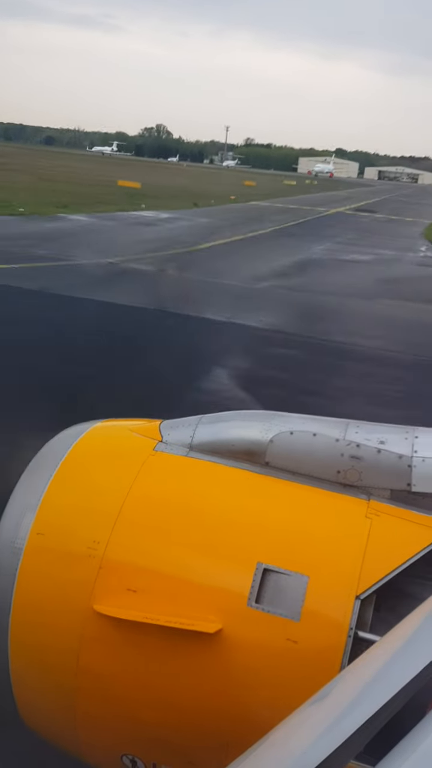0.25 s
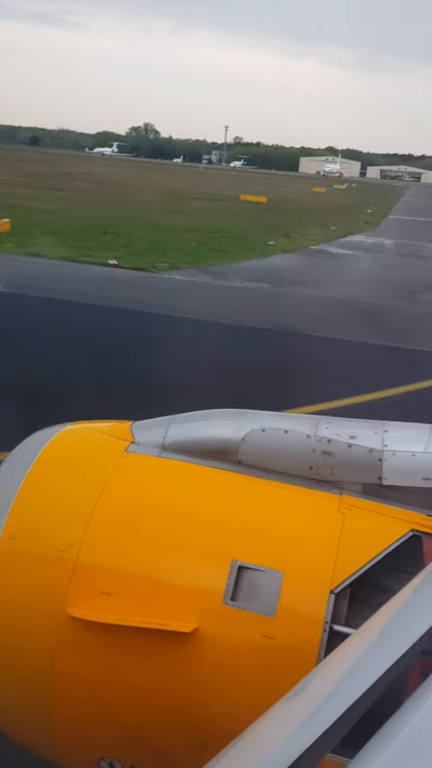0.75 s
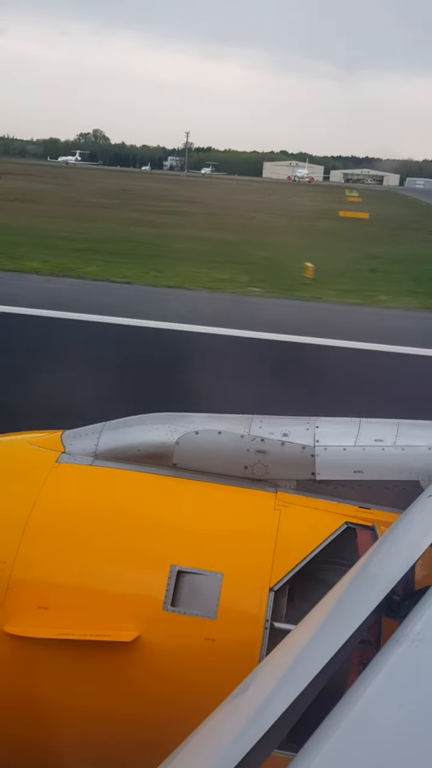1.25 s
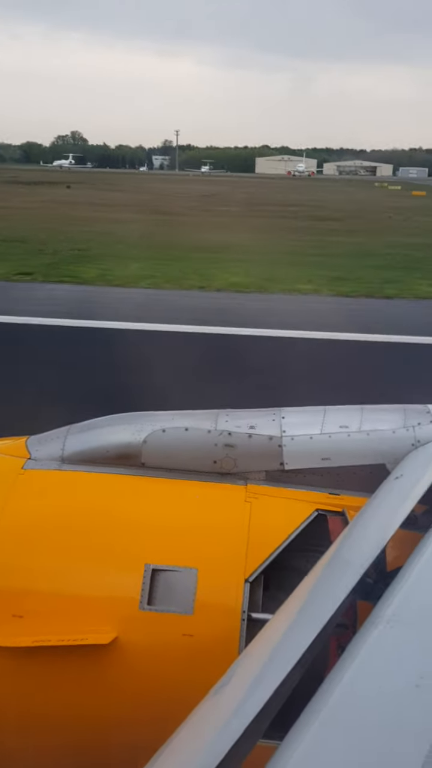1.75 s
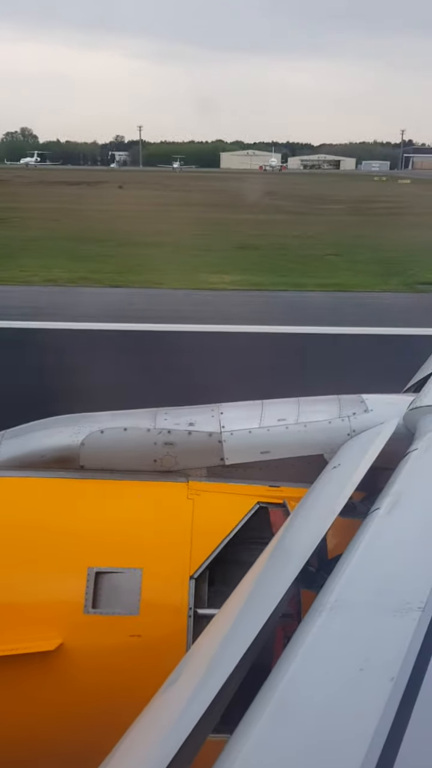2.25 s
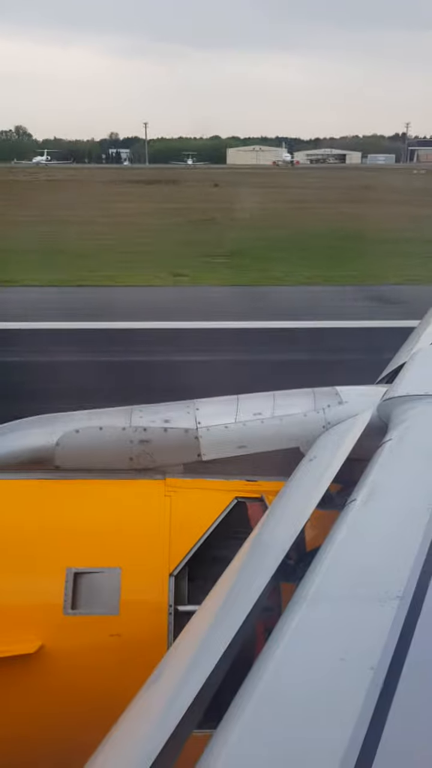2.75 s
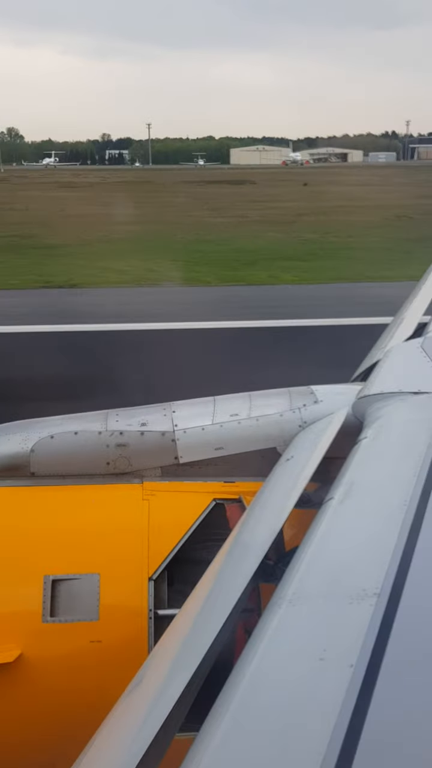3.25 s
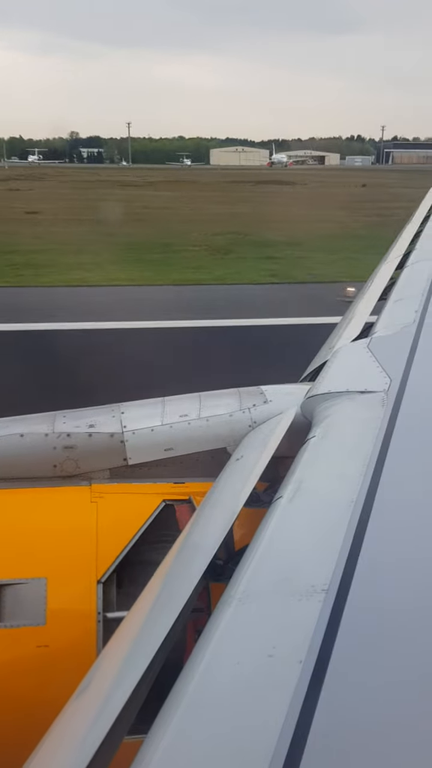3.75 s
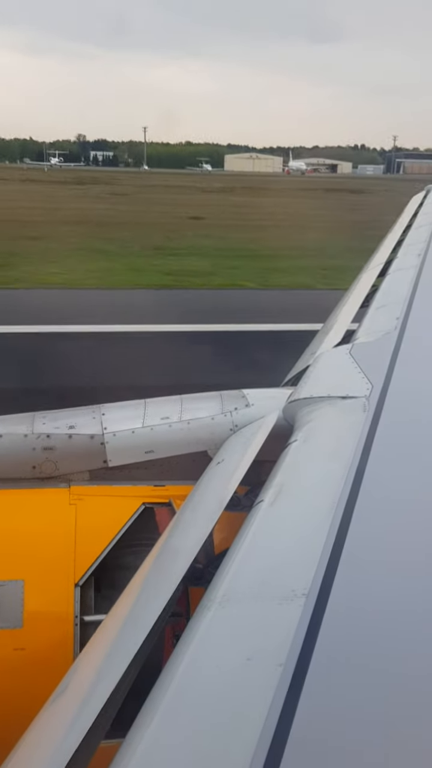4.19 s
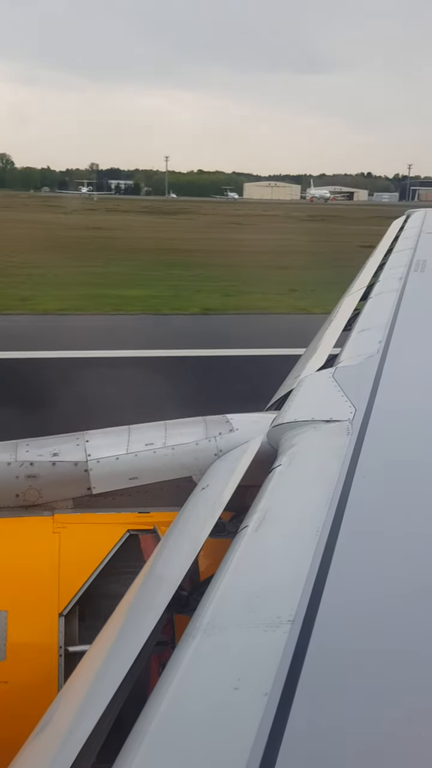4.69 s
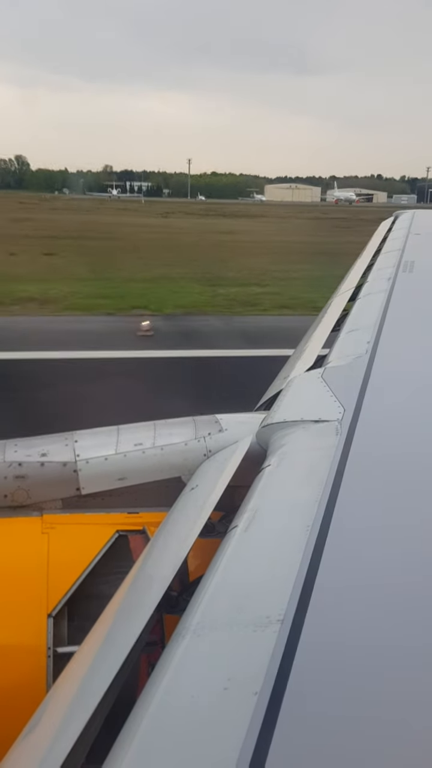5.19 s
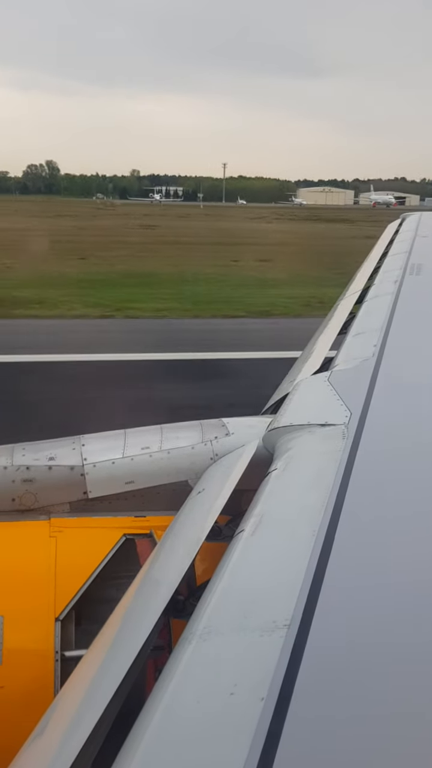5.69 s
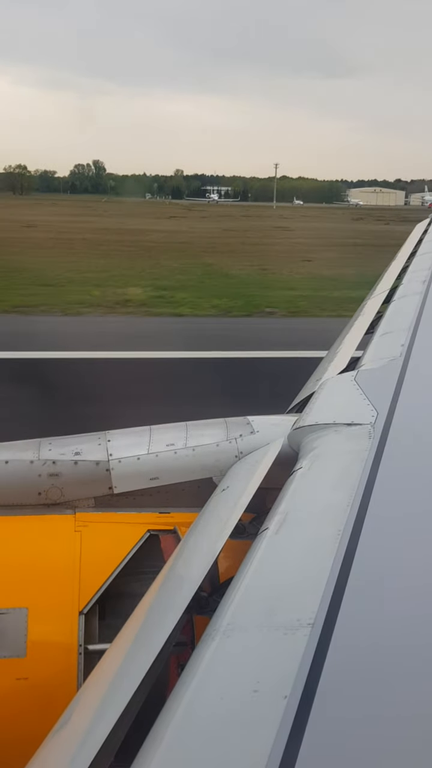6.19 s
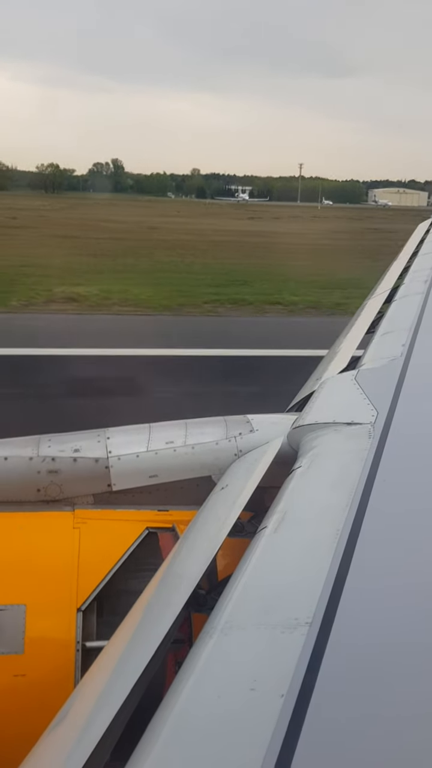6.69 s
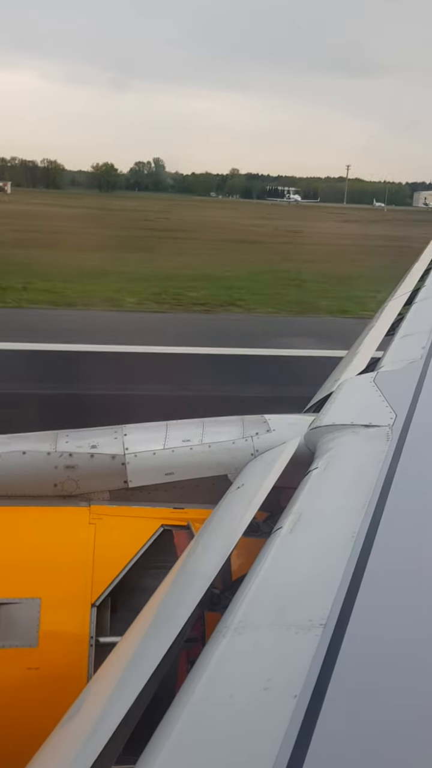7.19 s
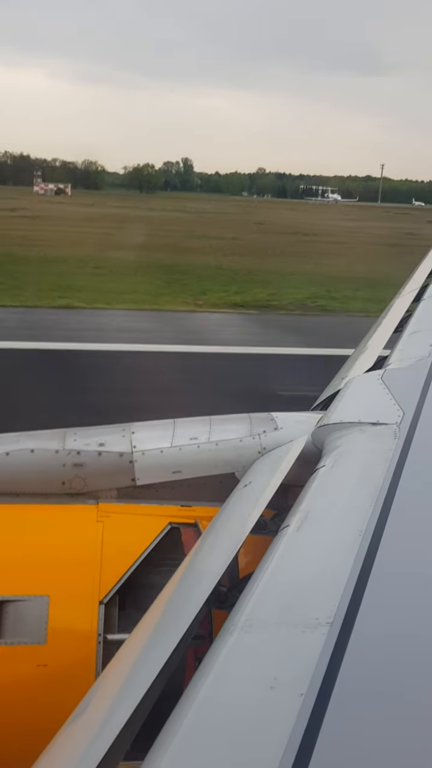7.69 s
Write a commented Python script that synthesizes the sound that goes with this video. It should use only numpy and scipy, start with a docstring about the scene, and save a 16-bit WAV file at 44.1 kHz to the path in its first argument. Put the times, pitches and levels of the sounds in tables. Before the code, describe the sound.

A loud, muffled roar of jet engines in reverse thrust is heard from inside an airliner cabin during the landing roll. A deep, steady drone and a higher hum sit over low runway rumble and a light hiss of air. Between about 0.4 and 0.7 seconds, four sharp, dry taps land close on the left, the last the loudest, among faint squeaks from the trim. The roar eases from about 1 to 2 seconds, then swells back. Another few taps come on the left between 3 and 3.5 seconds. From 3 seconds on, shaking panels give short, high, faint squeaks and loose fittings buzz in brief fits, busiest until about 5 seconds. The drone and roar hold steady, with a soft low bump from the runway near 7 seconds, and continue to the end at about 8 seconds.

```python
"""Inside an airliner's cabin, at a window beside the engine, during the landing roll in reverse thrust.
Two shaft tones, carried by the structure, drone over the runway rumble and the turbulent roar of the
reversed air, dulled by the fuselage. The shaking makes the cabin trim squeak by friction, buzz by
repeated impact and rustle, and a few dry taps land close to the left microphone."""
import sys
import numpy as np
from scipy import signal
from scipy.fft import rfft, irfft, next_fast_len
from scipy.io import wavfile
from scipy.ndimage import uniform_filter1d, minimum_filter1d, map_coordinates

SR = 44100
rng = np.random.default_rng(int(sys.argv[2]) if len(sys.argv) > 2 else 0)


def dump_mix(stems):
    """Bounce the given channels to the path in sys.argv[1] as a 16-bit WAV at rate SR."""
    frames = np.atleast_2d(stems).T  # one column per channel
    limited = np.clip(frames, -1, 1)  # hard clip at full scale
    pcm = np.round(limited * 32767).astype(np.int16)
    wavfile.write(sys.argv[1], SR, pcm)


N = 350154

# The roar's strength, with one early lull. Each row: time in seconds, dB against the steady roll.
FLOW = [(0, 3), (.55, 1.5), (1.2, -6.5), (1.75, -7.5), (2.15, -0.5), (3.6, 1), (4.4, 0.02), (7, 0.74),
        (7.94, 0)]
DRONE_HZ, WHINE_HZ = 168.45, 388.1  # the two shaft tones in the steady roll
HISS_DB, HISS_SLOPE = -43, 0.87  # level in the steady roll, dB per dB of the roar's strength


def amp(db):
    """Decibels as an amplitude ratio."""
    return 10 ** (np.asarray(db) / 20)


def unit(x):
    """Normalisation to an rms of 1."""
    return x / np.sqrt(np.mean(x ** 2) + 1e-20)


def along(points, hz):
    """Interpolation of (Hz, value) points on a logarithmic frequency axis."""
    knots_hz, values = np.transpose(points)
    return np.interp(np.log(hz + 1), np.log(knots_hz + 1), values)


def curve(points):
    """Linear interpolation of (seconds, value) points at every sample."""
    return np.interp(np.arange(N) / SR, *np.transpose(points))


def wobble(rate):
    """Smooth random modulation: a spline through `rate` Gaussian knots a second."""
    knots = rng.standard_normal(int(N * rate / SR) + 4)
    return map_coordinates(knots, [np.arange(N) * rate / SR])


def filtered(x, response):
    """Linear filtering: the spectrum of x times a frequency response."""
    size = next_fast_len(N + SR // 2)
    return irfft(rfft(x, size) * response(np.fft.rfftfreq(size, 1 / SR)), size)[..., :N]


def pan(lean_db):
    """Intensity stereo: two gains for a level difference, left minus right."""
    return amp(np.array([[.5], [-.5]]) * lean_db)


def add(track, start, sound):
    """Superposition of a sound on a track, `start` seconds in."""
    room = track[..., round(start * SR):][..., :sound.shape[-1]]
    room += sound[..., :room.shape[-1]]


def bursts(rows, rise_s, fall_s):
    """An envelope of exponential rise, hold and exponential decay for each (start, length, dB) row."""
    envelope, t = np.zeros(N), np.arange(SR) / SR
    for start, length, db in rows:
        decay = np.exp(-np.maximum(t - length, 0) / fall_s)
        add(envelope, start, amp(db) * (1 - np.exp(-t / rise_s)) * decay)
    return envelope


def flow_level(steady_db, slope):
    """A power law: a layer's level in dB moves by `slope` for each dB of the roar's strength."""
    return steady_db + slope * curve(FLOW)


def shaken(share, slots=120):
    """A random point process, denser as the cabin shakes more: rows of a time and two normal draws."""
    # The trim's restlessness. Each row: time in seconds, events a second at a share of 1.
    shaking = [(0, 4), (1, .5), (2.9, .5), (3.6, 7), (5.1, 7), (5.5, 1), (7.9, 1)]
    slot_s = N / SR / slots
    chance, spread = rng.random((slots, 2)), rng.standard_normal((slots, 2))
    starts = (np.arange(slots) + chance[:, 0]) * slot_s
    happens = chance[:, 1] < share * slot_s * np.interp(starts, *np.transpose(shaking))
    return np.column_stack([starts, spread])[happens]


def cabin(x, t60, wet_db):
    """Reverberation: seats and panels scatter a sound into a short tail, different at each microphone."""
    t = np.arange(SR // 4) / SR
    tail = rng.standard_normal((2, len(t))) * amp(-60 * t / t60)
    tail /= np.linalg.norm(tail, axis=1, keepdims=True)
    scattered = signal.fftconvolve(np.atleast_2d(x), tail, axes=1)[:, :N]
    return (x + amp(wet_db) * scattered) / np.hypot(1, amp(wet_db))


def rush(spectrum, patchy_db):
    """Turbulent noise of rms 1, partly coherent: the two microphones agree most at long wavelengths."""
    # Likeness of the two sides. Each row: frequency in Hz, correlation from -1 to 1.
    correlation = [(60, 1), (200, 0.89), (300, 0.69), (480, 0.64), (700, -0.17), (1400, -0.35),
                   (3000, 0.071), (12000, -0.42)]
    # Stereo balance. Each row: frequency in Hz, left minus right in dB.
    balance = [(60, 1), (115, 0.5), (160, 9), (230, 1.5), (330, 1), (650, 5), (950, 6), (1400, -0.5),
               (2250, -1.5), (3300, 1.5), (4800, 6), (7000, 4), (8500, 0), (15000, 1.5)]

    def mid_and_side(hz):
        """Correlation sets how the power divides between the sum and difference signals."""
        angle = np.arccos(np.clip(along(correlation, hz), -1, 1)) / 2
        return amp(along(spectrum, hz)) * [np.cos(angle), np.sin(angle)]

    cells = signal.stft(rng.standard_normal((2, N)), nperseg=512)[2]
    patches = uniform_filter1d(rng.standard_normal(cells.shape[1:]), size=6, axis=0)  # across frequency
    patches = uniform_filter1d(patches, size=14, axis=1)  # across time
    noise = signal.istft(cells * amp(patchy_db * unit(patches)), nperseg=512)[1][:, :N]
    mid, side = filtered(noise, mid_and_side)
    return unit(filtered(np.array([mid + side, mid - side]), lambda hz: pan(along(balance, hz))))


def runway_rumble():
    """Rolling noise: the runway shakes the wheels, and rough stretches swell the rumble."""
    # The rumble's spectrum. Each row: frequency in Hz, relative density in dB.
    spectrum = [(10, -22), (22, -10.5), (32, -10.5), (45, -1.5), (58, 4), (70, -5), (85, -7), (130, -25.5),
                (300, -70.5)]
    # Rough runway. Each row: start in seconds, length in seconds, level in dB.
    rough_stretches = [(0, 0.37, -19), (2.8, .3, -23.5), (3.5, .32, -21), (6.95, .25, -22.5)]
    swells = bursts(rough_stretches, rise_s=0.026, fall_s=0.046)
    return np.hypot(amp(flow_level(-24, slope=0.96)), swells) * rush(spectrum, patchy_db=-0.9)


def reversed_air():
    """Turbulence along the fuselage booms, roars and hisses; the wall passes low frequencies best."""
    # Spectra of the three bands in the cabin. Each row: frequency in Hz, relative density in dB.
    boom_spectrum = [(50, -30), (75, -3), (95, 0), (120, 0), (148, -3), (182, -2), (240, -13), (330, -20.5),
                     (500, -40), (900, -80)]
    roar_spectrum = [(120, -21), (250, 5.5), (340, 4), (420, 0.5), (500, -2), (620, -8.5), (780, -9),
                     (1000, -14), (1400, -21.5), (2500, -38), (6000, -84)]
    hiss_spectrum = [(500, -21.5), (1000, 4), (1500, 3.5), (2250, 3), (2700, -0.5), (3250, -2.5),
                     (4200, -8), (5000, -12.5), (6300, -16.5), (7200, -18.5), (8300, -25.5), (11000, -25),
                     (15500, -30.5)]
    gust = wobble(9.9)
    boom = amp(flow_level(-19, slope=1)) * rush(boom_spectrum, patchy_db=0)
    roar = amp(flow_level(-30, slope=1) + 0.19 * gust) * rush(roar_spectrum, patchy_db=1.55)
    hiss_db = flow_level(HISS_DB, HISS_SLOPE) + .5 * gust + 1.1 * wobble(40)
    return boom + roar + amp(hiss_db) * rush(hiss_spectrum, patchy_db=1.7)


def turbine_whistles():
    """Narrow-band noise is heard as pitch: turbine stages sing faintly, following the airflow."""
    # The whistles. Each row: centre in Hz, half-width in Hz, level in dB against the air's hiss.
    bands = [(3290, 130, -20), (7100, 40, -33), (7360, 70, -34)]
    track = np.zeros((2, N))
    for centre, width, db in bands:
        band = filtered(rng.standard_normal((2, N)), lambda hz: np.exp(-((hz - centre) / width) ** 2))
        track += amp(db) * unit(band)
    return amp(flow_level(HISS_DB, HISS_SLOPE)) * track


def airframe_bumps(cycles_to_peak=3.9):
    """Damped oscillation: each bump on the runway is a dull knock that swells and dies away."""
    # The knocks. Each row: start in seconds, pitch in Hz, peak level in dB.
    knocks = [(.257, 612, -32.5), (.293, 526, -27), (2.015, 884, -34), (3.365, 640, -36), (3.659, 850, -42),
              (7.029, 48, -17.5)]
    track, t = np.zeros(N), np.arange(SR // 3) / SR
    for start, hz, db in knocks:
        age = t * hz / cycles_to_peak
        add(track, start, amp(db) * age * np.exp(1 - age) * np.sin(2 * np.pi * hz * t))
    return track * pan(2)


def trim_rustles(grain_db=3, hiss_flicker_db=1.3):
    """Modulated noise: grainy, bright strokes over a faint, steady, slightly flickering microphone hiss."""
    # The strokes. Each row: start in seconds, length in seconds, level in dB.
    strokes = [(.524, .016, -41.5), (2.12, .067, -59), (2.97, .23, -57.5), (3.76, .013, -49.5),
               (5.679, .014, -38.5), (6.27, .06, -61), (7.0, .3, -60.5)]
    # The spectrum of strokes and hiss. Each row: frequency in Hz, relative density in dB.
    spectrum = [(800, -22), (2500, 5), (5000, 1.5), (8000, -5), (11500, -2.5), (15500, -6)]
    grain = amp(grain_db * wobble(400)) * rng.standard_normal((2, N))
    bright_noise = unit(filtered(grain, lambda hz: amp(along(spectrum, hz))))
    mic_hiss = amp(-65) * unit(amp(hiss_flicker_db * wobble(45)))
    return (bursts(strokes, rise_s=.0007, fall_s=0.0098) + mic_hiss) * bright_noise * pan(.5)


def fitting_rattles(jitter_cycles=.17, rebound_db=-6, scrape_s=.0008, faint_s=.02, faint_db=-52):
    """Forced impacts: in each drone cycle a loose fitting strikes, rebounds more lightly and rings."""
    # Fits of buzzing. Each row: start in seconds, length in seconds, level in dB.
    fits = [(.2, .05, -46), (.31, .028, -47.5), (.64, .037, -44.5), (3.04, 0.14, -49), (3.68, .11, -46.5),
            (3.85, .075, -46), (4.03, .02, -43.5), (4.18, 0.021, -44), (4.265, 0.045, -43),
            (4.385, .105, -47), (4.612, .06, -45.5), (4.742, .035, -43), (4.85, .048, -46.5),
            (5.885, .11, -48.5), (6.645, .042, -47), (7.18, .135, -47), (7.565, .07, -46),
            (7.772, .02, -47)]
    # The fitting's resonances. Each row: frequency in Hz, relative gain in dB.
    resonances = [(400, -25), (1100, 0), (1700, -3), (2900, 2), (3600, 2), (4150, 1), (4600, -2),
                  (5350, -8), (5680, 1), (6050, -10), (7200, -14), (7900, -21), (11500, -20), (15500, -23)]
    half_cycle = np.arange(1, int(2 * DRONE_HZ * N / SR) - 2)
    late, force_db = rng.standard_normal((2, len(half_cycle))) * [[jitter_cycles], [2.8]]
    at = np.round((half_cycle / 2 + late) * SR / DRONE_HZ).astype(int)
    force = amp(force_db + rebound_db * (half_cycle % 2))
    contacts = np.bincount(np.clip(at, 0, N - 1), force, minlength=N)
    # every contact breaks into about a millisecond of fine scraping
    scrape = signal.lfilter([1], [1, -np.exp(-1 / (scrape_s * SR))], contacts)
    scrape = scrape * rng.standard_normal((2, N))
    chatter = unit(filtered(scrape, lambda hz: amp(along(resonances, hz))))
    faint_fits = [(start, faint_s * np.exp(.4 * longer), faint_db + 2.5 * louder)
                  for start, longer, louder in shaken(share=1)]
    envelope = np.maximum(*[bursts(rows, rise_s=0.0016, fall_s=0.007) for rows in (fits, faint_fits)])
    return envelope * chatter * pan(11)


def panel_squeaks(swell_s=0.0053, faint_hz=3110, faint_db=-43, panel_hz=4220, panel_db=-13.5):
    """Stick-slip friction: a scratch settles into a raspy chirp with its octave and the panel's note."""
    # Trim panels slipping on each other. Each row: start in seconds, pitch in Hz, level in dB.
    slips = [(.208, 3570, -36), (0.408, 3636, -35), (.572, 3520, -33.5), (.979, 3655, -31),
             (2.994, 3084, -37), (3.102, 2460, -31), (3.535, 3634, -34), (3.721, 2980, -34),
             (3.99, 3195, -39.5), (4.468, 2930, -39), (4.657, 3166, -35.5), (5.035, 3320, -35.5),
             (5.74, 3145, -38), (6.521, 3154, -38), (6.843, 3040, -38), (7.3, 2757, -31),
             (7.566, 3110, -38.5)]
    # The octave's strength. Each row: the squeak's pitch in Hz, level in dB against the fundamental.
    octave_levels = [(2750, -18.5), (3100, -10.5), (3700, -19.5)]
    track, t = np.zeros((2, N)), np.arange(SR // 12) / SR
    envelope = t / swell_s * np.exp(1 - t / swell_s)
    glide = 0.01 * np.tanh(t / swell_s - 2)
    rasp_depth = .04 + .08 * np.exp(-t / .011)
    faint_slips = [(start, faint_hz * np.exp(0.046 * higher), faint_db + 1.5 * louder)
                   for start, higher, louder in shaken(share=.6)]
    grit = unit(uniform_filter1d(rng.standard_normal((2, N + SR)), size=24))
    for start, hz, db in slips + faint_slips:
        rasp = rasp_depth * grit[:, round(start * SR):][:, :len(t)]
        phase = 2 * np.pi * np.cumsum(hz * (1 + glide + rasp), axis=1) / SR
        octave = amp(along(octave_levels, hz)) * np.sin(phase + 2 * np.pi * hz * t)
        panel = amp(panel_db) * np.sin(phase + 2 * np.pi * (panel_hz - hz) * t)
        add(track, start, amp(db) * envelope * (np.sin(phase) + octave + panel))
    return cabin(track, t60=0.2, wet_db=-1) * pan(1.5)


def taps(casing_hz=850, casing_t60=.005):
    """Impulse response: each tap is one sharp push of pressure and a heavily damped swing of the casing."""
    # Each row: start in seconds, left peak in dB, bandwidth in Hz, bright tick in dB against the blow,
    # casing swing as a fraction of the blow, left minus right in dB.
    strikes = [(.4470, -14, 1800, -30, .14, 14), (.5075, -6.5, 2800, -50, .14, 18),
               (.5695, -9.5, 3000, -45, .14, 14), (.6823, 1, 3500, -48, .14, 30),
               (1.726, -30, 12000, -30, .05, -3), (3.081, -9.5, 4600, -32, .16, 14),
               (3.172, -18, 5500, -30, .1, 10), (3.2786, -8.5, 5700, -25, .12, 20),
               (3.4573, -7, 3900, -25, .24, 18)]
    track, t = np.zeros((2, N)), np.arange(SR // 50) / SR
    casing = np.cos(2 * np.pi * casing_hz * t) * amp(-60 * t / casing_t60)
    for start, db, width_hz, tick_db, swing, lean_db in strikes:
        blow = (t == 0) + swing * casing
        lowpass = signal.butter(6, width_hz, fs=SR, output="sos")
        push = signal.sosfilt(lowpass, blow) + amp(tick_db) * blow
        add(track, start, amp([[db], [db - lean_db]]) * push / push.max())
    return track


def shaft_tone(hz, flutter_db, rate, sway_rad):
    """Amplitude and phase modulation: a sine of rms 1 trembles with the airframe."""
    phase = 2 * np.pi * np.cumsum(hz) / SR + sway_rad * wobble(rate)
    return unit(amp(flutter_db * wobble(rate)) * np.sin(phase))


def engine_tones(sag_hz_per_db=0.26, dip_db=-10, dip_s=0.03):
    """Structure-borne sound: two almost pure shaft tones with faint harmonics sink as the roar eases."""
    # The deep drone, the upper whine and its octave. Each row: time in seconds, level in dB.
    drone_levels = [(0.0, -17), (0.06, -8.5), (0.15, -18), (0.17, -12), (0.66, -9), (0.68, -19),
                    (0.73, -12), (1.28, -17.5), (3.52, -10.5), (4.69, -10), (5.57, -15.5), (5.68, -12),
                    (6.12, -14), (6.17, -7), (6.21, -11), (7.76, -9.5), (7.94, -14)]
    whine_levels = [(0, -25.5), (.66, -25.5), (1.15, -34), (2.3, -30), (4.4, -21.5), (5.3, -24),
                    (6.15, -21), (7.94, -25.5)]
    octave_levels = [(0, -51), (.7, -50.5), (1.3, -62), (2.9, -46.5), (3.6, -46.5), (4.1, -53.5),
                     (7.9, -56)]
    # Brief dips in the whine's level. Each entry: time in seconds.
    dip_times = [2.36, 2.85, 3.56, 7.36]
    whine_hz = WHINE_HZ + sag_hz_per_db * curve(FLOW)
    drone_hz = whine_hz * DRONE_HZ / WHINE_HZ
    dips = sum(np.exp(-((np.arange(N) / SR - at) / dip_s) ** 2) for at in dip_times)
    drone_db, whine_db = curve(drone_levels), curve(whine_levels) + dip_db * dips
    drone = amp(drone_db) * shaft_tone(drone_hz, flutter_db=1.05, rate=20, sway_rad=.04)
    second = amp(drone_db - 32) * shaft_tone(2 * drone_hz, flutter_db=7, rate=4.4, sway_rad=0.93)
    third = amp(drone_db - 36.5) * shaft_tone(3 * drone_hz, flutter_db=3.5, rate=7.4, sway_rad=0.58)
    whine = amp(whine_db) * shaft_tone(whine_hz, flutter_db=0.9, rate=22, sway_rad=0.065)
    octave = amp(curve(octave_levels)) * shaft_tone(2 * whine_hz, flutter_db=-0.5, rate=25, sway_rad=0.47)
    return drone * pan(4.9) + (second + third) * pan(2.6) + whine * pan(.1) + octave * pan(2.9)


def scene():
    """Superposition of the noise from outside, the shaking cabin and the engine's tones."""
    outside = runway_rumble() + reversed_air() + turbine_whistles() + airframe_bumps()
    inside = trim_rustles() + fitting_rattles() + panel_squeaks() + taps()
    return outside + inside + engine_tones()


def record(dry):
    """Peak and band limiting: the gain eases down on peaks over full scale, and the top treble is cut."""
    window, top_hz = SR // 100, 15800
    needed = 1 / np.maximum(np.abs(dry).max(axis=0), 1)
    gain = uniform_filter1d(minimum_filter1d(needed, size=window), size=window)
    return filtered(dry * gain, lambda hz: hz < top_hz)


dry = scene()
out = record(dry)
dump_mix(out)
```